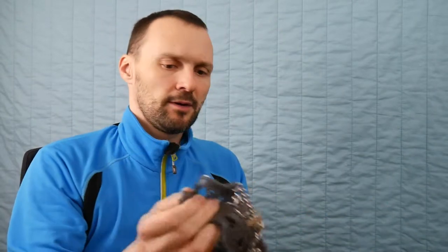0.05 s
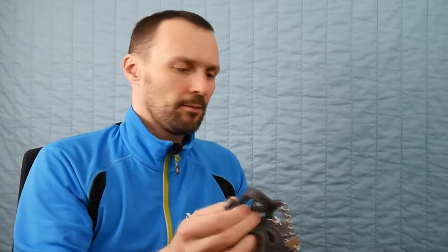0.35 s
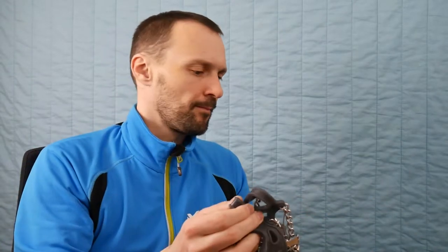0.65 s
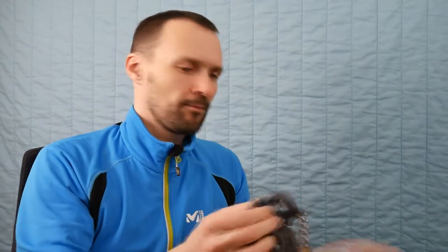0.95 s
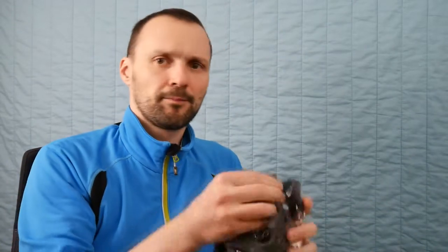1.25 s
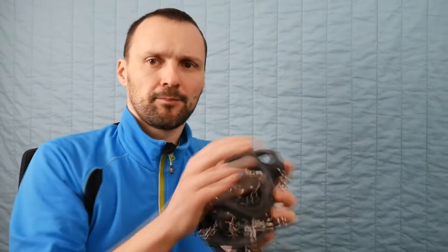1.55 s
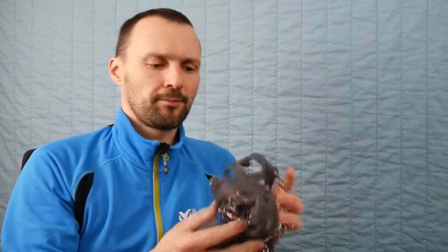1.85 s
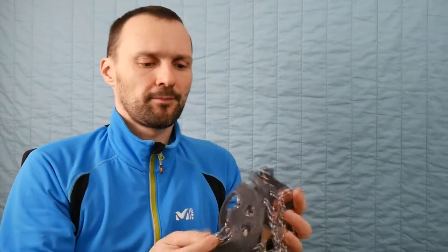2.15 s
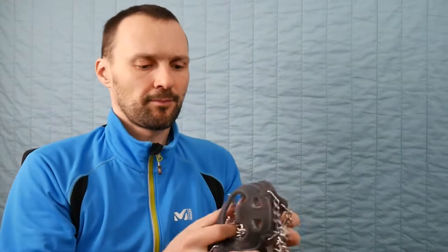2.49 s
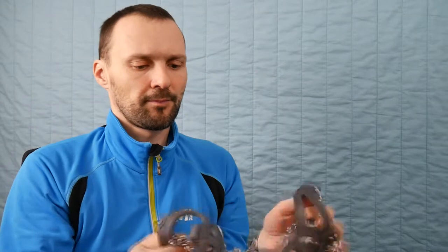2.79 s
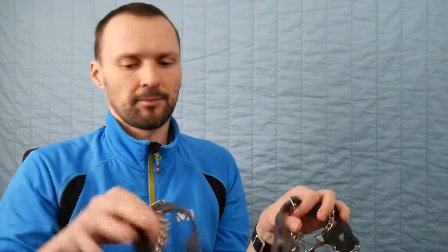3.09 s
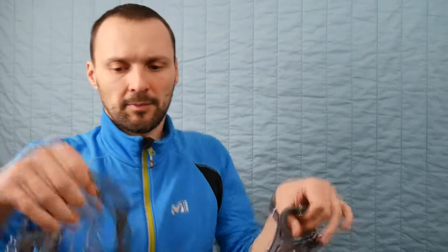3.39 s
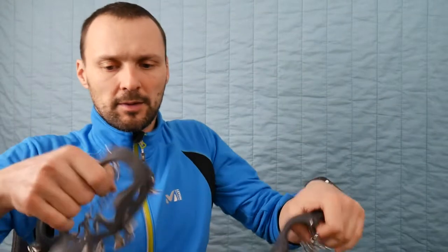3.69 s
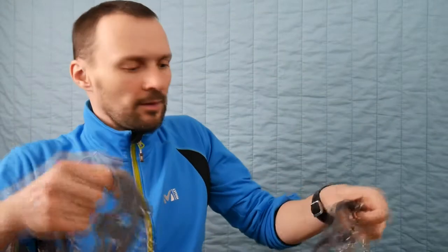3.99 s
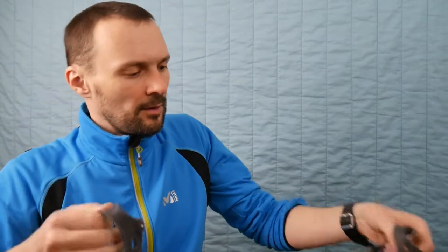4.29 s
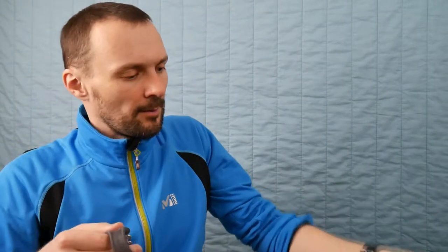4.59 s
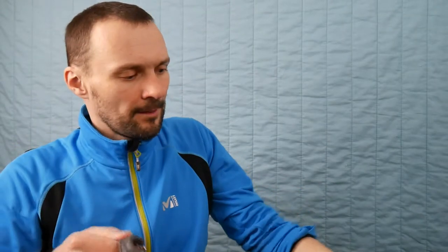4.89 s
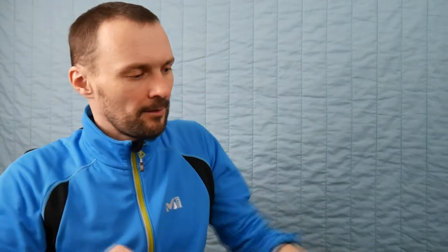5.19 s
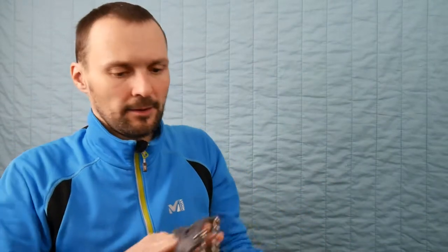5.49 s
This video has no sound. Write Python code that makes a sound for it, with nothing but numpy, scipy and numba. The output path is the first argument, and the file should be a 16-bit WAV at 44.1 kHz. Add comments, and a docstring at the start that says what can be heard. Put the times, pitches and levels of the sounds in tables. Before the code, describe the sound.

Close to the microphone in a small, dry room, hands squeeze a stiff plastic bag, which crackles briefly. Spiked steel boot chains follow, first as a muffled rustle of links, then as a looser, high jingle with sharp clinks. The chains settle as one is pressed onto the bag with a burst of crinkling and snapping. A last short rattle of links closes it.

```python
"""Steel boot chains and a plastic bag

Both are handled close by in a small, soft-walled room. The stiff bag crinkles and snaps
as its film buckles. The links rustle in the fist, then hang free and jingle while the
spike plates clink. One chain is pushed down on the bag; the other stirs again at the end."""
import sys
import numpy as np
from scipy import signal
from scipy.fft import rfft, irfft, next_fast_len
from scipy.io import wavfile
from scipy.ndimage import uniform_filter1d
from numba import njit

SR = 44100
rng = np.random.default_rng(int(sys.argv[2]) if len(sys.argv) > 2 else 0)


def output_pcm(signal):
    """Save a mono or channel-first signal as 16-bit PCM at the path in sys.argv[1].

    Samples are clipped to [-1, 1] before scaling.
    """
    pcm = np.clip(np.atleast_2d(signal).T, -1, 1) * 32767
    wavfile.write(sys.argv[1], SR, np.round(pcm).astype(np.int16))


N = 253431


def amp(db):
    """Decibels to gain."""
    return 10 ** (np.asarray(db) / 20)


def unit(x):
    """Scale to rms 1."""
    return x / np.sqrt(np.mean(x ** 2) + 1e-20)


def even(x, window_s):
    """Level to about rms 1 per window; the finer grain stays."""
    power = np.abs(uniform_filter1d(x ** 2, int(window_s * SR)))
    return x / np.sqrt(power + np.mean(x ** 2) / 1000)


def unit_hit(x):
    """Scale a hit to the energy of 1 ms at full level."""
    return x / np.sqrt(np.sum(x ** 2) / (SR / 1000) + 1e-20)


def along(points, hz):
    """Read (Hz, value) points on a log axis."""
    point_hz, values = np.transpose(points)
    return np.interp(np.log(hz + 1), np.log(point_hz + 1), values)


def filtered(x, response):
    """Apply a response given as a function of Hz."""
    size = next_fast_len(N + SR // 2)
    return irfft(rfft(x, size) * response(np.fft.rfftfreq(size, 1 / SR)), size)[..., :N]


def coloured(x, spectrum, size=2048):
    """Minimum-phase filter from (Hz, dB) points; clicks keep their sharp front."""
    cepstrum = irfft(np.log(amp(along(spectrum, np.fft.rfftfreq(size, 1 / SR)))))
    cepstrum[1:size // 2] *= 2
    cepstrum[size // 2 + 1:] = 0
    impulse = irfft(np.exp(rfft(cepstrum)))
    return signal.oaconvolve(x, impulse)[:len(x)]


def add(track, start_s, sound):
    """Mix a sound into a track."""
    start = round(start_s * SR)
    track[start:start + len(sound)] += sound[:N - start]


@njit
def oscillators(starts, poles, gains, lengths):
    """Sum decaying complex oscillators, one per partial."""
    out = np.zeros(N)
    for k in range(len(starts)):
        z = gains[k] + 0j
        for n in range(starts[k], min(starts[k] + lengths[k], N)):
            out[n] += z.imag
            z *= poles[k]
    return out


def pings(start_s, hz, t60_s, gain):
    """Damped sines; the arguments broadcast."""
    start_s, hz, t60_s, gain = (a.flatten() for a in np.broadcast_arrays(start_s, hz, t60_s, gain))
    poles = np.exp((2j * np.pi * hz - np.log(1000) / t60_s) / SR)
    return oscillators((start_s * SR).astype(np.int64), poles, gain, (t60_s * SR).astype(np.int64))


def contacts(count, spread_db):
    """Random times and strengths, one row per contact."""
    start_s = rng.uniform(0, N / SR, (count, 1))
    return start_s, amp(spread_db * np.minimum(rng.standard_normal((count, 1)), 2))


def grains(count, spread_db, top_hz, t60_s, scatter_s, partials=4):
    """Small contacts, each a cluster of short pings at random pitches."""
    start_s, strength = contacts(count, spread_db)
    lag, pitch, life = rng.random((3, count, partials))
    sign = rng.choice([-1, 1], (count, partials))
    return pings(start_s + scatter_s * lag, top_hz * pitch, t60_s * (0.5 + life), strength * sign)


def burst(rate_per_s, t60_s):
    """A first contact, then a dying chatter."""
    t = np.arange(SR // 20) / SR
    struck = rng.random(len(t)) < rate_per_s / SR
    hits = struck * rng.uniform(-1.61, 1, len(t)) * amp(-60 * t / t60_s)
    hits[0] = 1
    return hits


def flurries(rate_per_s, depth_db):
    """Smooth random gain: contacts come in clumps."""
    knots = rng.standard_normal(N // 100)
    return amp(depth_db * np.interp(np.arange(N) * rate_per_s / SR, np.arange(len(knots)), knots))


def stroke(start_s, length_s, attack_s, swell_db, settle_db_per_s):
    """Gain of one hand movement: soft onset, a swell or dip midway, then the material settles."""
    t = np.arange(N) / SR - start_s
    rise = np.sin(np.pi / 2 * np.clip(t / attack_s + 0.5, 0, 1)) ** 2
    arch = np.sin(np.pi * np.clip(t / length_s, 0, 1)) ** 2
    return rise * amp(swell_db * arch - settle_db_per_s * np.maximum(t - length_s, 0))


# Background noise. Each row: frequency in Hz, relative level in dB.
HUSH_SPECTRUM = [(15, -46), (25, -16), (149, -9), (200, -1), (416, -8), (775, -8), (863, -5), (1190, -11.5),
                 (1700, -10.5), (1940, -17), (3920, -20), (12500, -24.5), (16000, -32)]


def hush():
    """Steady noise of the room and microphone."""
    mid, side = (unit(coloured(rng.standard_normal(N), HUSH_SPECTRUM)) for _ in range(2))
    return amp(-67.5) * (mid + amp(-17.5) * np.array([side, -side]))


# Room decay. Each row: frequency in Hz, t60 in seconds.
ROOM_DECAY = [(150, 0.38), (500, 0.13), (1400, 0.11), (4000, 0.11), (12000, 0.15)]


def room(x, wet_db, side_db):
    """Direct sound plus a short tail, slightly different at each ear."""
    hz, t, noise = signal.stft(rng.standard_normal((2, SR // 2)), SR, nperseg=256)
    decay = amp(-60 * t / along(ROOM_DECAY, hz)[:, None])
    _, tail = signal.istft(noise * decay, SR, nperseg=256)
    tail[:, :SR // 500] = 0  # 2 ms pre-delay
    mid, side = signal.fftconvolve(x[None], tail / np.linalg.norm(tail[0]), axes=1)[:, :N]
    return x + amp(wet_db) * (mid + amp(side_db) * np.array([side, -side]))


# Room resonances. Each row: centre in Hz, width in Hz, relative gain in dB.
ROOM_MODES = [(123.6, 8.3, 0.5), (178, 10.7, 6), (248.8, 14.3, 14.5), (299, 27, -9), (405, 25, 1),
              (529, 11, 12), (727, 21, 7.5), (1153, 123, -1), (1566, 21, -1.5), (2034, 24, 4),
              (2605, 25, -10), (3050, 16, -10.5)]


def standing_waves(x):
    """The room rings on at its modes."""
    return filtered(x, lambda hz: sum(
        amp(db) * 1j * hz * width_hz / (centre_hz ** 2 - hz ** 2 + 1j * hz * width_hz)
        for centre_hz, width_hz, db in ROOM_MODES))


# Spectra of folds and creases. Each row: frequency in Hz, relative level in dB.
FOLD_SPECTRUM = [(30, -33), (80, -34.5), (130, -18), (200, -19), (400, -13), (720, -3.5), (1150, 4.5),
                 (1700, 1), (2400, -5.5), (3600, -18), (7000, -52.5), (16000, -65)]
CREASE_SPECTRUM = [(200, -52), (1200, -7), (2500, 8), (3800, -1), (6000, -4), (8000, -9.5), (11000, -21),
                   (15500, -28.5)]
# Hands squeeze the bag. Each row: start and length in seconds, level in dB, crease offset in dB.
BAG_SQUEEZES = [(-0.03, 0.26, -41, -7.5), (0.31, 0.15, -45.5, -12), (0.582, 0.19, -40.5, -10.5),
                (4.53, 0.15, -42, 0.5), (4.686, .44, -37, -2), (5.25, 0.037, -49.5, -1)]


def bag_crinkle():
    """Broad folds crackle low while swarms of small creases tick above them."""
    folds = grains(count=5000, spread_db=4.5, top_hz=5950, t60_s=0.0085, scatter_s=0.00196, partials=3)
    creases = grains(count=7000, spread_db=5, top_hz=15820, t60_s=0.016, scatter_s=0.002)
    folds = even(coloured(folds, FOLD_SPECTRUM), window_s=0.044)
    creases = even(coloured(creases, CREASE_SPECTRUM), window_s=0.0088)
    out = np.zeros(N)
    for start_s, length_s, db, crease_db in BAG_SQUEEZES:
        grip = stroke(start_s, length_s, attack_s=0.37 * length_s, swell_db=2, settle_db_per_s=164)
        out += amp(db) * grip * (amp(-4.5) * folds + amp(crease_db) * creases)
    return out


# Bag snaps and, at 2.331 s, a soft hollow tap as the chains are handled.
# Each row: start in seconds, relative level in dB, pitch in Hz.
SNAPS_AND_TAP = [(0.0345, -28, 2270), (0.095, -24, 2530), (0.082, -46, 2200), (0.166, -28.5, 2280),
                 (0.182, -37, 2250), (0.2007, -27, 2500), (0.316, -36, 1700), (0.7178, -27.5, 1120),
                 (0.865, -43.5, 1120), (0.953, -54.5, 1047), (1.085, -54, 1120), (1.162, -57.5, 1030),
                 (2.331, -53.5, 1330), (4.5115, -26.5, 3520), (4.5221, -24, 2970), (4.555, -24, 1380),
                 (4.6045, -29, 2200), (4.6215, -25, 1890), (4.7713, -26, 3470), (4.7961, -30.5, 3680),
                 (4.8251, -22.5, 2010), (4.842, -23, 3080), (4.971, -29, 3200), (5.013, -28, 3250),
                 (5.1195, -29, 2420), (5.2568, -39.5, 2860), (5.404, -52.5, 1660)]


def snaps_and_tap():
    """Quick runs of clicks. In a snap a film panel flips; large ones sound lower, thump and last more."""
    out = np.zeros(N)
    air_spectrum = [(30, -56), (85, -34), (150, -24), (300, -15.5), (450, -20.5)]
    push_db_per_octave = 9.5
    for start_s, db, hz in SNAPS_AND_TAP:
        push_db = push_db_per_octave * np.log2(2000 / hz)
        thump = [(air_hz, air_db + push_db) for air_hz, air_db in air_spectrum]
        body = [(hz * 0.59, -1), (hz, 0), (hz * 2.22, -7.5), (hz * 3.53, -25), (hz * 6, -36)]
        clicks = burst(rate_per_s=9000, t60_s=0.033 * np.sqrt(2000 / hz))
        add(out, start_s, amp(db + 7.5) * unit_hit(coloured(clicks, thump + body)))
    return out


def hollow_tap(start_s=3.561, hz=1290, t60_s=0.05, db=-45, attack_s=0.0013):
    """One soft tap as the chains are pulled apart."""
    out, t = np.zeros(N), np.arange(SR // 15) / SR
    envelope = amp(db - 60 * t / t60_s) * (1 - np.exp(-t / attack_s))
    add(out, start_s, envelope * np.sin(2 * np.pi * hz * t))
    return out


# Slack of the links. Each row: time in seconds, ringing gain in dB.
LINK_SLACK = [(1.2, -8), (2.2, -12), (2.45, 0.5), (3.3, 2.5), (4.3, -0.5), (4.9, 16.5), (5.7, 0.5)]


def looseness(time_s):
    """Ringing gain: low in the fist, high when the links hang free."""
    return amp(np.interp(time_s, *np.transpose(LINK_SLACK)))


# Steel resonances. Each row: frequency in Hz, relative level in dB, t60 in seconds.
STEEL_MODES = [(2226, -11.5, 0.089), (3230, -10, 0.078), (4920, -6, 0.052), (5073, -3.5, 0.055),
               (5680, -0.5, 0.061), (6756, 1, 0.1), (7660, 3, 0.053), (8856, 6.5, 0.023), (9200, -7, 0.055),
               (10270, 5.5, 0.035), (10050, 4, 0.16), (12030, 1, .08), (12500, -19, .08),
               (13000, 3.5, 0.069), (14750, 1, 0.062)]


def link_rings(start_s, strength, vary_db, detune=0.008, scatter_s=0.004):
    """Each contact rings a slightly different link, whose modes start within milliseconds."""
    hz, db, t60_s = np.transpose(STEEL_MODES)
    tuning, variation = rng.standard_normal((2, len(start_s), len(hz)))
    gain = strength * amp(db + vary_db * np.minimum(variation, 2))
    gain *= np.sqrt(t60_s.min() / t60_s)  # energy independent of decay time
    lag_s = scatter_s * rng.random(gain.shape)
    sign = rng.choice([-1, 1], gain.shape)
    return pings(start_s + lag_s, hz * (1 + detune * tuning), t60_s, gain * sign)


# Link striking link. Each row: frequency in Hz, relative level in dB.
TICK_SPECTRUM = [(30, -51.5), (200, -18.5), (600, -20.5), (1800, -13.5), (4200, -11.5), (5200, -6),
                 (7000, -5), (9300, -0.5), (10400, -9), (11200, -7.5), (13000, 1.5), (14700, -7.5),
                 (16000, -8.5)]
# A chain runs over itself. Each row: start and length in seconds, level in dB, midway swell in dB.
CHAIN_PULLS = [(1.214, 0.22, -54, 11.5), (1.584, 0.094, -53, 7), (1.739, 0.048, -48.5, 0),
               (1.836, 0.29, -46, 1), (2.249, 0.061, -56, 6), (2.331, .72, -42.5, -0.5),
               (2.72, 0.11, -50, 10), (3.126, 0.3, -46.5, 2.5), (3.459, 0.44, -44.5, 6),
               (3.924, 0.14, -43.5, 3.5), (4.138, .3, -60, 3.5), (4.514, 0.54, -49, -9.5),
               (5.633, 0.22, -62.5, 8.5)]


def chain_jingle():
    """Links tick against each other, a few stand out; the looser they hang, the more they ring."""
    ticks = grains(count=11000, spread_db=0, top_hz=16170, t60_s=0.018, scatter_s=0.0015)
    rings = link_rings(*contacts(count=800, spread_db=8), vary_db=8.5)
    strays = grains(count=160, spread_db=1.5, top_hz=16050, t60_s=0.019, scatter_s=0.0006, partials=14)
    ticks = amp(-3.5) * even(coloured(ticks, TICK_SPECTRUM), window_s=0.067)
    rings = amp(-6) * looseness(np.arange(N) / SR) * even(rings, window_s=0.052)
    strays = amp(-12.5) * unit(coloured(strays, TICK_SPECTRUM))
    motion = sum(
        amp(db) * stroke(start_s, length_s, attack_s=0.049, swell_db=swell_db, settle_db_per_s=255)
        for start_s, length_s, db, swell_db in CHAIN_PULLS)
    return motion * flurries(rate_per_s=70, depth_db=0.5) * (ticks + strays + rings)


# Notes of the spike plates. Each row: frequency in Hz, relative level in dB,
# gain at full brightness in dB, t60 in seconds at looseness 1.
PLATE_MODES = [(2225, -22, -3, 0.1), (10312, 0, -7.5, 0.07), (12350, -6.5, 1, 0.12),
               (13170, -2.5, 7.5, 0.08)]
# Steel strikes the plates. Each row: start in seconds, relative rattle and ring levels in dB,
# ring brightness from -1 (10.3 kHz note leads) to 1 (13.2 kHz note leads).
PLATE_STRIKES = [(0.463, -54, -57, 0.22), (1.016, -61, -67, 0), (1.185, -41, -47, -1),
                 (1.46, -53.5, -50, 1), (1.852, -38, -68.5, 0.61), (1.898, -36, -46, .5),
                 (2.082, -38.5, -60, .6), (2.39, -51, -41, -0.03), (2.466, -36.5, -36.5, -0.67),
                 (2.572, -61, -36, 0.97), (2.719, -36.5, -35.5, 0.21), (2.81, -41, -37.5, 0.7),
                 (2.922, -30.5, -44, 0.53), (2.97, -41.5, -34.5, 0.84), (3.037, -47, -45.5, .2),
                 (3.208, -34.5, -44, -0.15), (3.465, -43.5, -53, 0.66), (3.514, -58, -44, 0.88),
                 (3.67, -33.5, -43.5, -1), (3.734, -41, -37.5, 0.62), (3.894, -38.5, -42, 0.48),
                 (3.965, -41.5, -40.5, 0.88), (4.04, -43, -43.5, -1.2), (4.109, -47.5, -51, 0.91),
                 (4.187, -47.5, -51.5, -0.33), (4.244, -49, -78, -0.46), (4.35, -40, -59, -.8),
                 (5.517, -73, -78, .2), (5.617, -53.5, -68, -0.49), (5.677, -50.5, -63, -0.87),
                 (5.74, -37, -50, 0)]


def plate_clinks():
    """A hard knock rattles nearby links and rings the spike plates, unless the fist damps them."""
    strikes = np.array(PLATE_STRIKES)
    rattle = np.zeros(N)
    for start_s, db in strikes[:, :2]:
        chatter = coloured(burst(rate_per_s=7300, t60_s=0.083), TICK_SPECTRUM)
        add(rattle, start_s, amp(db + 2.5) * unit_hit(chatter))
    start_s, rattle_db, ring_db, brightness = strikes.T[:, :, None]
    loose = looseness(start_s)
    links = link_rings(start_s, loose * amp(rattle_db - 5), vary_db=5.5)
    hz, mode_db, bright_db, t60_s = np.transpose(PLATE_MODES)
    notes_db = ring_db + mode_db + np.clip(brightness, -1, 1) * bright_db
    hz = hz * (1 + 0.0014 * rng.standard_normal(notes_db.shape))  # no two plates are alike
    plates = pings(start_s, hz, t60_s * loose, 2 * loose * amp(notes_db))
    return rattle + links + plates


def scene():
    """Bag and chains straight ahead in the room."""
    bag = bag_crinkle() + snaps_and_tap()
    bag += amp(-3) * standing_waves(bag)
    chains = chain_jingle() + plate_clinks() + hollow_tap()
    return room(bag, wet_db=-2.5, side_db=-25) + room(chains, wet_db=-6.5, side_db=-17.5) + hush()


def record(dry):
    """Steep low-pass."""
    cutoff_hz = 15850
    return filtered(dry, lambda hz: 1 / np.sqrt(1 + (hz / cutoff_hz) ** 200))


dry = scene()
out = record(dry)
output_pcm(out)
```